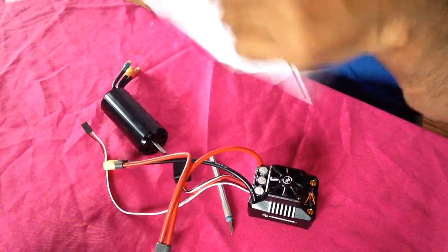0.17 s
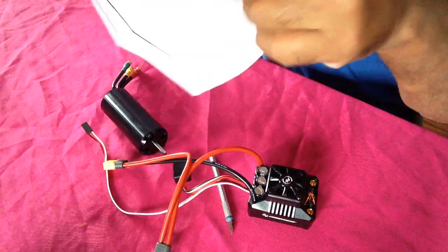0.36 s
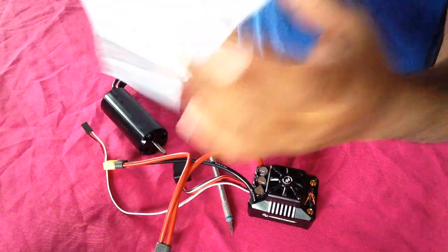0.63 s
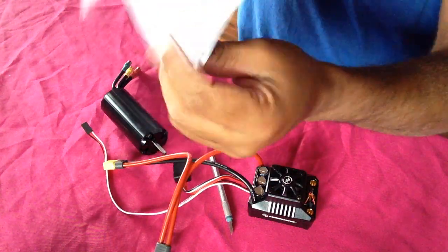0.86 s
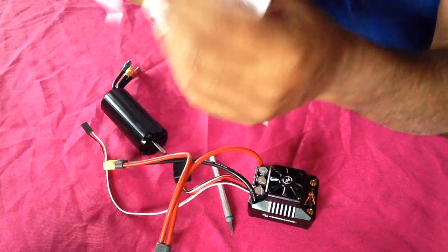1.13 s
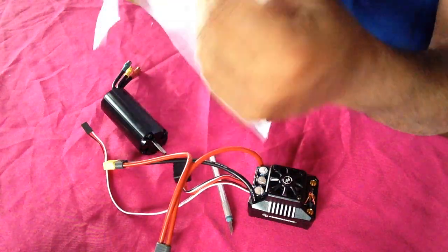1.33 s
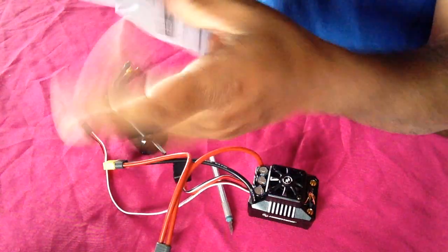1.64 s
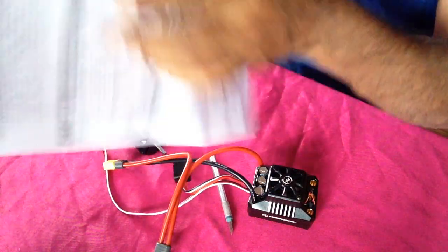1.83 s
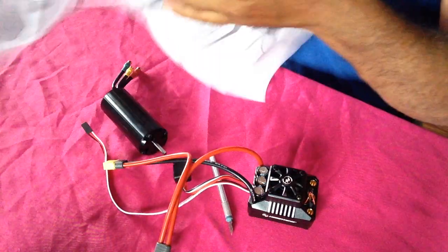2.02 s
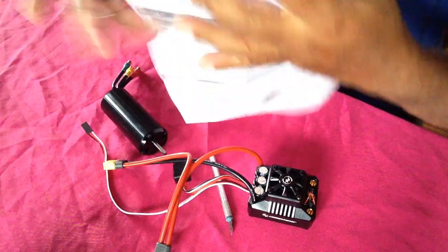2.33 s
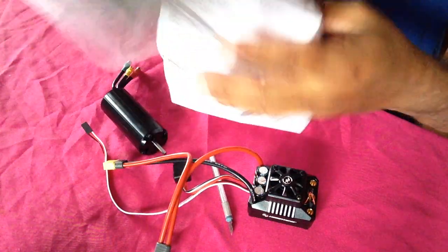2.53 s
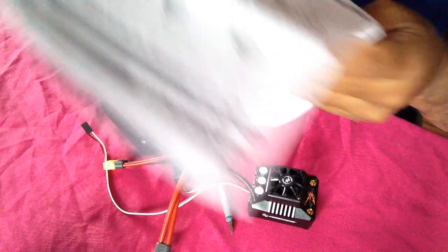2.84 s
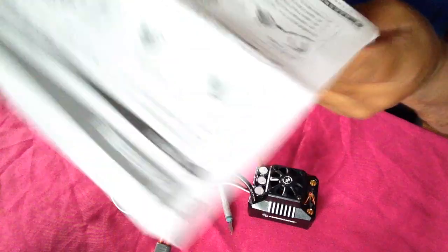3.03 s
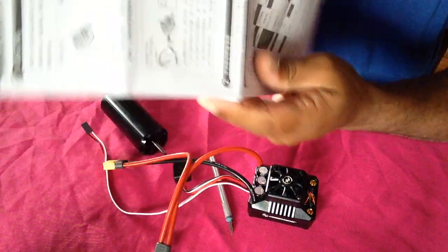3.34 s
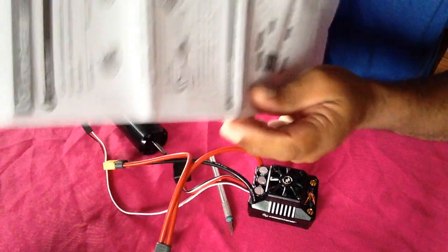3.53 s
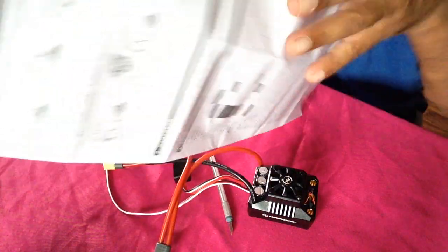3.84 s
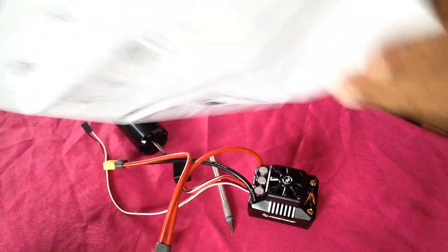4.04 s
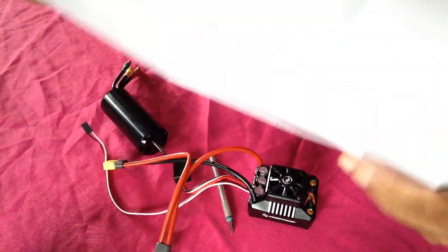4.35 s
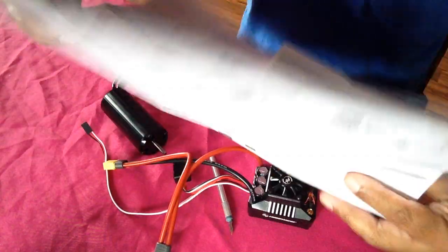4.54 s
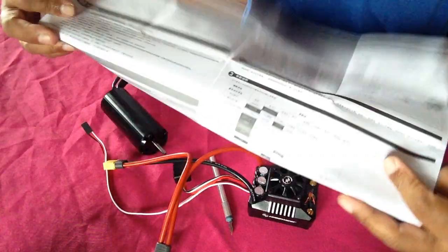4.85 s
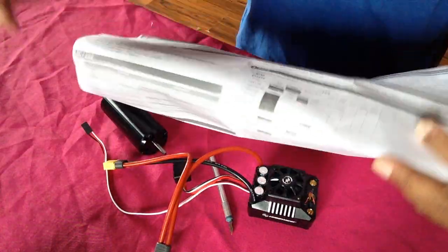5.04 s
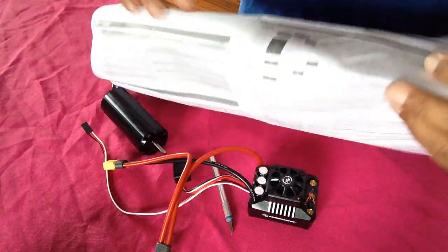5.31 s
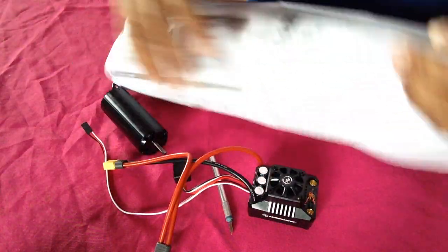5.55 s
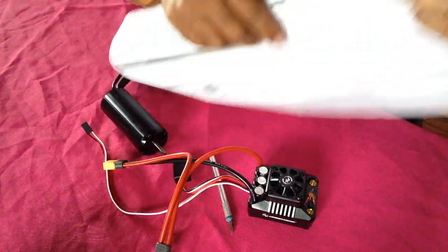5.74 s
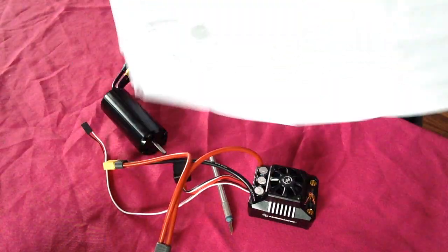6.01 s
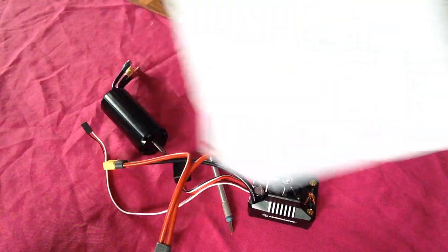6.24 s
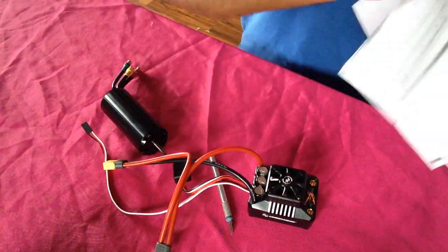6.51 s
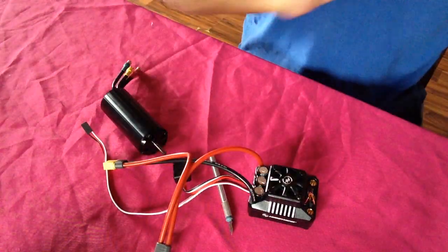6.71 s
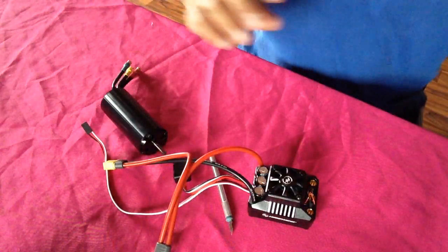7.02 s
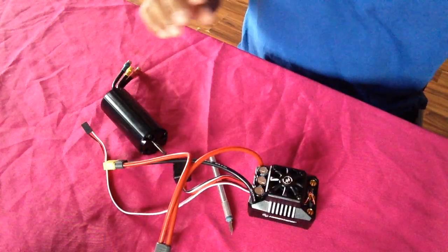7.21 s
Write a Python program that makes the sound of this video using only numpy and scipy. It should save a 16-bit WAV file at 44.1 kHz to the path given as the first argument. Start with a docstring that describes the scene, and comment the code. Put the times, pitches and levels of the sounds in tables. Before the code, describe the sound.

Crisp, dry paper crinkling heard from close up. Creases pop in uneven clusters over fine rustle and sliding hiss, while larger panels buckle with short, low, papery thuds and faint puffs of air. The activity peaks near two seconds, stays busy past the middle, calms, then returns with bold flaps. The quiet room adds only a brief, short reflection.

```python
"""Unfolding a large paper sheet

A large paper sheet is unfolded, turned and refolded by hand over a cloth-covered table, heard from close by.
Creases snap as bursts of grainy noise through resonances; panels flap as short low notes with a push of air.
Under them many tiny ringing buckles and shaped noise make a rustle that follows the hands.
A small furnished room briefly answers the snaps and flaps, over quiet room air and a very faint whistle."""
import sys
import numpy as np
from scipy import signal
from scipy.fft import rfft, irfft, next_fast_len
from scipy.io import wavfile
from scipy.ndimage import uniform_filter1d, map_coordinates

SR = 44100
rng = np.random.default_rng(int(sys.argv[2]) if len(sys.argv) > 2 else 0)


def put_to_file(sound):
    """Save the sound as 16-bit audio at rate SR, in the file named by the first command-line argument."""
    columns = np.atleast_2d(sound).T  # one column per channel
    safe = np.clip(columns, -1, 1)
    whole_steps = np.round(safe * 32767)
    wavfile.write(sys.argv[1], SR, whole_steps.astype(np.int16))


N = 325232

# How hard the hands work the sheet. Each row: time in seconds, crackle level in dB.
HAND_MOTION = [(0, -44), (.045, -60.5), (.175, -64.5), (.309, -37), (.369, -53), (.444, -60.5),
               (.569, -54.5), (.72, -62.5), (.783, -68.5), (.923, -52.5), (1.003, -62.5), (1.107, -52),
               (1.177, -60.5), (1.372, -49.5), (1.571, -68), (1.631, -52.5), (1.711, -65.5), (1.836, -56.5),
               (1.93, -71), (1.971, -43.5), (2.27, -41.5), (2.504, -61), (2.564, -43), (2.719, -59),
               (2.834, -44.5), (2.93, -54.5), (3.038, -67.5), (3.248, -62), (3.332, -53), (3.542, -58),
               (3.72, -50), (3.831, -68.5), (3.946, -60.5), (3.996, -54), (4.185, -65.5), (4.335, -53.5),
               (4.46, -66), (4.639, -50.5), (4.844, -47.5), (4.929, -57), (5.15, -62.5), (5.22, -67),
               (5.368, -75), (5.56, -69), (5.62, -59.5), (5.667, -64), (5.747, -44), (5.842, -50.5),
               (6.016, -52.5), (6.071, -68.5), (6.121, -59), (6.196, -65), (6.281, -61), (6.395, -63),
               (6.475, -57), (6.51, -45), (6.63, -52.5), (6.849, -58.5), (7.2, -78.5), (7.29, -50),
               (7.373, -55.5)]


def amp(db):
    """Turn decibels into a gain."""
    return 10 ** (np.asarray(db) / 20)


def unit(x):
    """Scale to an rms of 1 along the last axis."""
    return x / np.sqrt(np.mean(x ** 2, axis=-1, keepdims=True) + 1e-20)


def along(points, hz):
    """Read a curve of (Hz, value) points, joined by straight lines on a log frequency axis."""
    point_hz, value = np.transpose(points)
    return np.interp(np.log(hz + 1), np.log(point_hz + 1), value)


def curves(rows):
    """Give one value per sample for each column after the time."""
    s, *columns = np.transpose(rows)
    t = np.arange(N) / SR
    return [np.interp(t, s, column) for column in columns]


def wobble(rate):
    """Make a smooth random curve through `rate` random points a second."""
    points = rng.standard_normal(int(N * rate / SR) + 4)
    return map_coordinates(points, [np.arange(N) * rate / SR])


def filtered(x, response):
    """Multiply the spectrum of x by a response that depends on frequency."""
    length = next_fast_len(x.shape[-1] + 8192)
    hz = np.fft.rfftfreq(length, 1 / SR)
    return irfft(rfft(x, length) * response(hz), length)[..., :x.shape[-1]]


def colored(x, spectrum):
    """Shape x with a spectrum of (Hz, dB) points."""
    return filtered(x, lambda hz: amp(along(spectrum, hz)))


def resonance(f, centre_hz, width):
    """Respond like one ringing part, strongest at its centre; width is a share of the centre."""
    damping = 1j * f * width * centre_hz
    return damping / (centre_hz ** 2 - f * f + damping)


def place(seconds, rows):
    """Sum short sounds into one track, each from its own start."""
    at = np.round(seconds * SR).astype(int)[:, None] + np.arange(rows.shape[1])
    return np.bincount(at.ravel(), rows.ravel(), N + SR)[:N]


def snap_peak(x):
    """Scale each row so that its loudest 2.5 ms has an rms of 1."""
    power = uniform_filter1d(x * x, size=110)
    return x / np.sqrt(np.max(power, axis=1, keepdims=True))


def snaps():
    """A crease flips: a grainy burst rings the paper around it, the panel below and the edge above in pitch."""
    # Creases snapping. Each row: start in seconds, crease peak in dB, centre in Hz,
    # panel level against the crease in dB, rise in ms, time to fade by 60 dB in ms (both limited below).
    listed_snaps = [(.1791, -55, 2130, -4, .9, 16), (.222, -29.5, 2640, -38, 0.97, 38),
                    (.2478, -37, 2800, -26, 2.9, 43), (.2893, -29, 3100, 0, 3.6, 42),
                    (.305, -33, 2630, 2, 21, 21), (.3343, -39.5, 2180, -2, 0.99, 36),
                    (.5112, -46, 1980, -16, 1, 27), (.5685, -43.5, 4270, -4, 6.3, 56),
                    (.6112, -49, 4630, -12, 5.9, 29), (.6439, -44, 2200, -12, 2.2, 26),
                    (.6807, -54, 1950, 7, 1.8, 18), (.8058, -33.5, 3200, -4, 1.35, 36),
                    (.836, -45.5, 1930, 10.5, 2.1, 22), (.8736, -45, 2090, -14, 2.1, 27),
                    (.9073, -29, 3500, -9.5, 2.8, 12), (.9215, -49.5, 2300, 10.5, 3.7, 42),
                    (1.0372, -46, 2840, 3, 1.25, 130), (1.0562, -30, 3350, -23, 0.72, 11),
                    (1.0932, -38.5, 2980, -3, 1, 30), (1.111, -35, 3100, -4, 0.96, 16),
                    (1.254, -35, 2600, 4.5, 13.3, 58), (1.3234, -50, 2270, -21, 2.4, 25),
                    (1.3451, -36.5, 3360, -17, 1.9, 27), (1.3584, -39.5, 2530, -0.5, 1.8, 42),
                    (1.432, -36, 3400, -5, 1.4, 29), (1.4997, -45.5, 2200, 4, 1, 80),
                    (1.6069, -28.5, 3000, -2, 0.54, 24), (1.652, -34.5, 4670, -8, 0.67, 15),
                    (1.8191, -34, 3040, -5.5, 7.9, 12), (1.9425, -49.5, 1830, 8.5, 0.76, 330),
                    (1.9592, -21.5, 4200, -16, 0.81, 20.4), (1.9713, -36, 1850, 5, 0.67, 33),
                    (1.9792, -37, 2520, 2, 0.64, 16), (2.017, -28, 2620, -4.5, 8.5, 79),
                    (2.0418, -15, 4220, -9, 1.1, 10), (2.0578, -38, 2170, 10.5, 0.32, 16),
                    (2.1083, -34, 2250, -14, 3.7, 23), (2.1606, -37.5, 2460, 4, 3.3, 36),
                    (2.171, -31, 2900, 1, 8.6, 50), (2.1978, -31, 2580, -10, 2.6, 32),
                    (2.2525, -32.5, 3120, -8, 12, 150), (2.3137, -38, 2600, 0, 1.8, 40),
                    (2.3678, -30.5, 3330, -11, 1.4, 12), (2.4283, -44, 2240, 1, 9, 98),
                    (2.539, -31, 4100, -9, 4.9, 9.8), (2.5643, -33.5, 2930, -3.5, 2.8, 34),
                    (2.673, -35, 2090, -8, 1.24, 22), (2.8068, -39.5, 2120, 0, 2.4, 55),
                    (2.819, -41.5, 2660, -4, 16, 130), (2.8741, -31.5, 2740, -3, 0.72, 7.2),
                    (3.119, -48.5, 2750, 2, 1.3, 14), (3.1372, -47.5, 3050, -15, 1.6, 16),
                    (3.2603, -39.5, 2570, 0, 3.2, 41), (3.3145, -31, 2830, -7.5, 0.98, 26),
                    (3.4137, -42.5, 2450, -26, 3.2, 45), (3.474, -44, 2660, -10, 17, 99),
                    (3.558, -46, 3050, 1, 0.65, 9), (3.594, -27.5, 3480, -5.5, 2.2, 21),
                    (3.6939, -43, 3900, -6, 7, 100), (3.8693, -40, 1790, -16, 0.32, 15),
                    (3.8945, -54.5, 1550, 10.5, 2.1, 31), (3.9946, -33.5, 4950, -12, 1.1, 17),
                    (4.066, -45.5, 3550, -5, 11, 250), (4.145, -38, 4260, -21, 2.9, 22),
                    (4.1802, -54, 4660, -2, .8, 14), (4.256, -37, 4650, -1, 2.9, 6.2),
                    (4.281, -47, 2300, 5.5, 4.4, 38), (4.3081, -34.5, 2630, 1.5, 1, 23),
                    (4.3238, -39, 2120, 7, 0.99, 12), (4.3562, -41.5, 2010, 3.5, 0.69, 24),
                    (4.5454, -36.5, 3000, 2, 0.93, 42), (4.597, -26.5, 4900, -10.5, 0.37, 27),
                    (4.6158, -45, 3630, 11, 0.83, 63), (4.6381, -44.5, 2640, 9.5, 1.5, 97),
                    (4.6537, -34.5, 2360, -23, 0.77, 28), (4.6648, -32.5, 4900, -10, 0.26, 20),
                    (4.7042, -32.5, 2180, -3.5, 0.71, 25), (4.7426, -23, 4900, -6.5, 0.91, 4.2),
                    (4.765, -32.5, 4000, -29, .9, 5.6), (4.8249, -30, 3840, 1.5, 1.64, 18),
                    (4.849, -43.5, 2260, 12, 7.9, 24), (4.8804, -40, 1920, -23, 1.1, 9.7),
                    (4.962, -53, 1550, 10, 1.8, 61), (5.008, -54, 1800, 7, 3.9, 47),
                    (5.0798, -54, 2530, 8.5, 4.5, 170), (5.678, -55.5, 1470, 14, 3.9, 120),
                    (5.7015, -42.5, 1780, 15, 1, 8.6), (5.7112, -38, 2600, 11, 5.1, 73),
                    (5.7311, -36.5, 2030, 7.5, 19, 58), (5.7593, -37, 2480, 7, 3.2, 29),
                    (5.7691, -43, 1770, 13, .3, 52), (5.781, -40.5, 1970, 6, 8, 130),
                    (5.872, -44, 3100, -3, 5.1, 67), (5.9095, -48, 1570, 9.5, 1.7, 7.8),
                    (5.9316, -41, 3120, -21, 1.3, 18), (6.0085, -54, 2330, 11, 24, 62),
                    (6.1, -42.5, 1570, -8, 0.73, 150), (6.4309, -36, 2830, 1, 0.72, 30),
                    (6.4882, -23, 2710, -10, 11.7, 35), (6.5273, -35.5, 2270, -1, 2.3, 10),
                    (6.5398, -38, 2240, -7, 3.1, 68), (6.6156, -45, 3250, -17, 3.9, 16),
                    (6.6592, -23, 4000, -9.5, 0.39, 13), (6.7099, -40, 3300, -20, 1.1, 11),
                    (6.7207, -28, 3800, -11.5, 0.49, 14), (6.7617, -36, 4300, -26, 0.8, 21),
                    (6.7835, -45, 5040, -23, 1.2, 21), (6.8347, -48.5, 2940, 3, 1.1, 29),
                    (6.892, -45, 1940, -25, 0.65, 20), (6.9112, -48.5, 2420, -3, 0.68, 16),
                    (6.9752, -51.5, 3000, 4, 0.71, 23), (7.22, -45.5, 3900, -4, 5.5, 230),
                    (7.2878, -41, 2740, -7, 5.1, 92), (7.3267, -44.5, 3000, 7.5, 11.2, 27),
                    (7.342, -41.5, 2730, -3, 5.4, 100)]
    rows = np.vstack([listed_snaps, stray_ticks(count=160)])
    s, db, centre_hz, panel_db, rise_ms, t60_ms = rows.T[..., None]
    # the edge's share shrinks 1 dB per dB of a louder snap
    edge_db = -30 - 1 * (db + 43)

    ms = np.arange(5000) / SR * 1000
    rise_ms, t60_ms = np.clip(rise_ms, .1, 30), np.clip(t60_ms, 5, 200)
    rise_db = -11 * (1 - ms / rise_ms)
    fade_db = -60 * (ms - rise_ms) / t60_ms
    shape = amp(np.where(ms < rise_ms, rise_db, fade_db))
    noise = rng.standard_normal((len(rows), len(ms)))
    grains = noise * np.abs(noise) ** 1.07  # the power makes strong grains stand out
    # only a sudden flip gives one clean crack
    crack = 3.0 * np.exp(-((ms - rise_ms) / 0.028) ** 2) / (1 + rise_ms ** 2)
    burst = grains * shape + crack

    # three small facets beside each crease ring briefly, at pitches scattered around its centre
    facet_hz = centre_hz * amp(rng.normal(0, 5.1, (len(rows), 3))).T[..., None]

    def crease_response(f):
        """The paper's two broad resonances with the facets on top."""
        facets = 1 + 0.28 * sum(resonance(f, hz, 0.14) for hz in facet_hz)
        return resonance(f, centre_hz, 1.9) * resonance(f, 0.8 * centre_hz, 1.0) * facets

    crease = snap_peak(filtered(burst, crease_response))
    panel = snap_peak(filtered(burst, lambda f: resonance(f, 790, 2.34) ** 2))
    edge = snap_peak(filtered(burst, lambda f: resonance(f, 7500, 1.7) ** 2))
    return place(s[:, 0], amp(db) * (crease + amp(panel_db) * panel + amp(edge_db) * edge))


def stray_ticks(count):
    """Make extra rows of small snaps at random moments; their strength follows the hands."""
    when, size, pitch = rng.random((count, 3)).T
    s = when * N / SR
    motion_db = np.interp(s, *np.transpose(HAND_MOTION))
    db = motion_db + 0.5 - 3.5 * np.log(1 - size)  # a few are much louder than the rest
    centre_hz = 2860 * 3 ** (pitch - .5)
    panel_db, rise_ms, t60_ms = (np.full(count, value) for value in (-7.5, 0.895, 13))
    return np.transpose([s, db, centre_hz, panel_db, rise_ms, t60_ms])


def flaps():
    """A panel pops through: a few cycles of its own note and one soft push of air."""
    # Panels flapping. Each row: start in seconds, peak of the note in dB, centre in Hz,
    # air push level against the note in dB, before the push's own rise and fade.
    panel_flaps = [(0.3, -40, 400, -3), (0.834, -28.5, 390, -23.5), (1.097, -32.5, 800, -12),
                   (1.263, -32, 726, -4.5), (1.359, -49, 400, 4), (1.603, -40.5, 206, -3),
                   (1.738, -45, 198, -11.1), (1.941, -40, 400, 4), (1.961, -32, 580.0, -0.5),
                   (2.034, -32, 288, -5), (2.175, -32, 940, -13), (2.367, -29, 930, -23),
                   (2.75, -44, 520, -13), (3.557, -35, 800, -23.3), (3.595, -32, 780, -4),
                   (3.67, -35.5, 490, -7), (4.04, -37, 700, -15), (4.351, -30, 750, -7),
                   (4.378, -51, 400, 0), (4.436, -48, 755, -31), (4.629, -31, 810, -30),
                   (4.821, -28, 370, -25), (4.854, -30.5, 353, -16), (4.891, -35, 356, -18),
                   (4.961, -37, 557, -26.2), (5.01, -30.5, 745, -18), (5.056, -34, 415, -27),
                   (5.136, -37, 580, -21.5), (5.253, -46, 383, -3), (5.526, -38.5, 445, -14),
                   (5.652, -38, 423, -1.5), (5.741, -21.5, 785, -10), (5.799, -29.5, 433, -14),
                   (6.028, -36, 415, -26), (6.119, -38, 445, -18), (6.486, -24.5, 510, -18.5),
                   (6.656, -40, 360, -14), (7.287, -23, 574, -9)]
    s, db, centre_hz, push_db = np.transpose(panel_flaps)[..., None]
    t = np.arange(4096) / SR
    kick = rng.standard_normal((len(panel_flaps), len(t))) * amp(-t * 1350)  # fades 1350 dB a second
    note = filtered(kick, lambda f: resonance(f, centre_hz, 0.78) ** 2)
    note = note / np.abs(note).max(axis=1, keepdims=True)
    push_hz = 80 * amp(rng.normal(0, 1.5, (len(panel_flaps), 1)))
    push_shape = amp(-t * 1100) * (1 - np.exp(-t * 300))
    push = np.sin(2 * np.pi * push_hz * t) * push_shape
    return place(s[:, 0], amp(db) * (note + amp(push_db) * push))


def rustle():
    """Tiny buckles of unequal size come in clumps over rubbing noise; one hand motion drives all four layers."""
    # How the motion is shared out. Each row: time in seconds, then panel rumble, sliding hiss
    # and stirred air, each in dB against the crackle.
    shares = [(0, 1, -1.5, -9), (.5, -2, -2.5, -10), (.85, 7, -3, -3.5), (1.25, -1.5, -1.5, -3.5),
              (1.9, 0.5, -2.5, -7), (2.3, -4, -1, -13.5), (2.9, -5.5, 0, -12), (3.5, -0.5, 0, -9),
              (4.1, 3.5, 0.5, 0.5), (4.4, 7, -1, -10), (4.7, -4, -4, -18), (5.05, 5, 4, -14),
              (5.6, 4.5, 0, -4), (5.9, -9, 1.5, -17), (6.15, 3.5, -2, -2.5), (6.7, -6.5, -2.5, -17),
              (7.0, 3, -6.5, -8), (7.37, 2, 5, -6)]
    # The tone color of each layer. Each row: frequency in Hz, strength in dB per Hz.
    crackle_color, panel_color = [(300, -85), (800, -3.5), (1500, -2), (2500, 0), (4500, -10.5),
                                  (8000, -8.5), (16400, -17)], [(60, -32.5), (150, 1), (250, 0.5), (450, -3),
                                                   (850, -1.5), (1500, -10.5), (3000, -19.5), (9000, -83)]
    hiss_color, stir_color = [(1500, -64), (4000, 1.5), (6500, 1.5), (9000, -5.5), (16400, -11)], [(20, -48), (45, -8.5), (85, -5), (150, -8.5), (400, -41.5)]
    motion_db, = curves(HAND_MOTION)
    panel_db, hiss_db, stir_db = curves(shares)
    ticks = buckles(count=11000)
    clump = wobble(60) + 0.84 * wobble(160)  # shared by all layers

    def layer(color, share, clump_db, own_db):
        """Mix buckles into noise, let the level waver, then color it."""
        grain = share * ticks + patches(depth_db=3.0)
        waver_db = clump_db * clump + own_db * wobble(50)
        return unit(colored(grain * amp(waver_db), color))

    crackle = layer(crackle_color, share=0.25, clump_db=2.46, own_db=2.5)
    panel = amp(panel_db) * layer(panel_color, share=0.53, clump_db=0.86, own_db=4.5)
    hiss = amp(hiss_db) * layer(hiss_color, share=0.17, clump_db=0.97, own_db=2.5)
    stir = amp(stir_db) * layer(stir_color, share=0.39, clump_db=-0.5, own_db=0.5)
    return amp(motion_db) * (crackle + panel + hiss + stir)


def buckles(count):
    """Tiny buckles at random moments, each ringing a few cycles at its own pitch; rms 1."""
    when, pitch, size, life = rng.random((count, 4)).T[..., None]
    hz = 350 * 25 ** pitch
    t = np.arange(300) / SR
    strength = (1 - .98 * size) ** -.45 * np.sqrt(hz)  # many small, few large
    ring = np.sin(2 * np.pi * hz * t) * np.exp(-t * hz / (3.0 + 3 * life))
    return unit(place(when[:, 0] * N / SR, strength * ring))


def patches(depth_db):
    """Noise whose color drifts in random patches of time and frequency."""
    z = signal.stft(rng.standard_normal(N + 256), nperseg=256)[2]
    field = uniform_filter1d(rng.standard_normal(z.shape), size=5, axis=0)  # smooth over frequency
    field = uniform_filter1d(field, size=9, axis=1)  # smooth over time
    gain = amp(depth_db * field / field.std())
    return unit(signal.istft(z * gain, nperseg=256)[1][:N])


def room(x):
    """Each frequency of the room's answer dies at its own speed; the random tail is redrawn every quarter second."""
    # How long the room rings. Each row: frequency in Hz, time to fade by 60 dB in seconds.
    fade_times = [(150, 0.23), (1500, 0.15), (10000, 0.028)]
    hop = SR // 4  # a quarter second
    out = np.zeros(N + 4 * hop)
    for start in range(0, N, hop):
        hz, t, z = signal.stft(rng.standard_normal(hop), SR, nperseg=256)
        fade = amp(-60 * t / along(fade_times, hz)[:, None])
        tail = signal.istft(z * fade, SR, nperseg=256)[1][:hop]
        wet = signal.fftconvolve(x[start:start + hop], tail / np.linalg.norm(tail))
        out[start + 150:][:len(wet)] += wet  # the answer comes 150 samples (3.4 ms) late
    return out[:N]


def background():
    """Still room air as colored noise, and a faint falling whistle as a wavering sine."""
    # A thin falling tone. Each row: time in seconds, pitch in Hz and level in dB, around which it wavers.
    whistle_path = [(6.8, 7150, -95), (6.9, 6900, -72), (7.15, 6900, -78), (7.25, 6760, -74),
                    (7.3, 6650, -95)]
    # The tone color of the quiet room. Each row: frequency in Hz, strength in dB per Hz.
    air_color = [(20, -10), (80, 5), (250, 4), (1000, -18), (4000, -6), (16400, -18)]
    hz, db = curves(whistle_path)
    level = amp(db + 3 * wobble(60))
    phase = 2 * np.pi * np.cumsum(hz + 55 * wobble(76)) / SR
    air = unit(colored(rng.standard_normal(N), air_color))
    return amp(-69.5) * air + level * np.sin(phase)


def scene():
    """Sum the sheet, the room's answer to its snaps and flaps, and the background."""
    hits = snaps() + flaps()
    answer = amp(-13.0) * room(hits)
    return (hits + answer + rustle() + background())[None]


def record(dry):
    """The microphone drops the deep bass and softens the treble; the very top is cut in two steps."""
    roll_hz, top_hz = 15350, 16398  # 33 dB down from the first, silent from the second

    def response(f):
        """Gain of the whole chain at each frequency."""
        top = np.where(f < roll_hz, 1, amp(-33.0)) * (f < top_hz)
        treble = 1 / (1 + 1j * f / 10500)  # 3 dB down at 10500 Hz
        bass = (1j * f / (45 + 1j * f)) ** 2  # falls below about 45 Hz
        return top * treble * bass

    return filtered(dry, response)


dry = scene()
out = record(dry)
put_to_file(out)
```